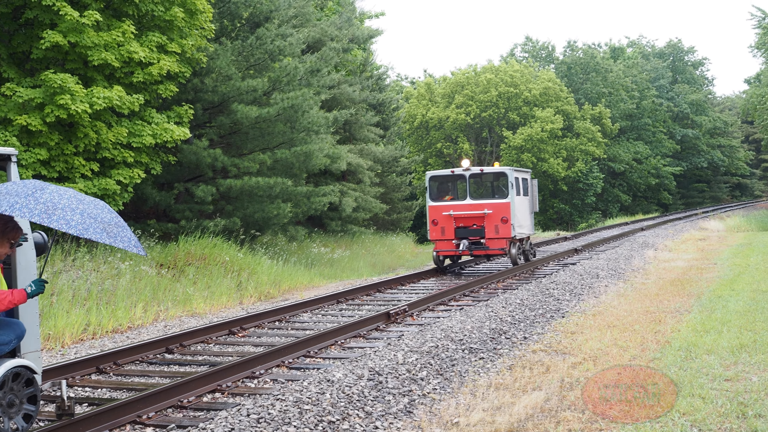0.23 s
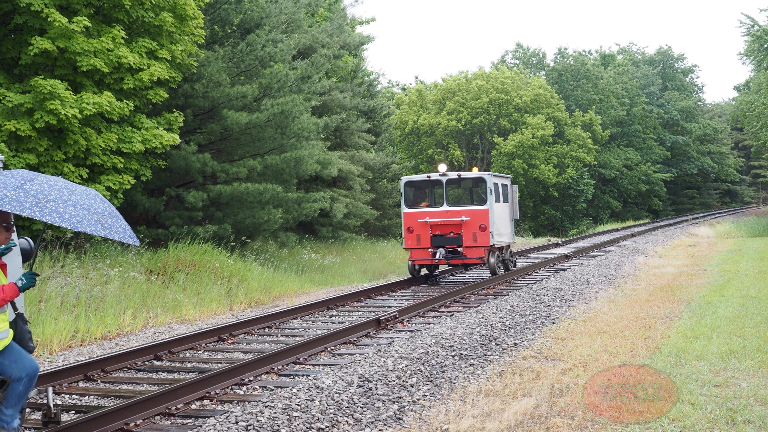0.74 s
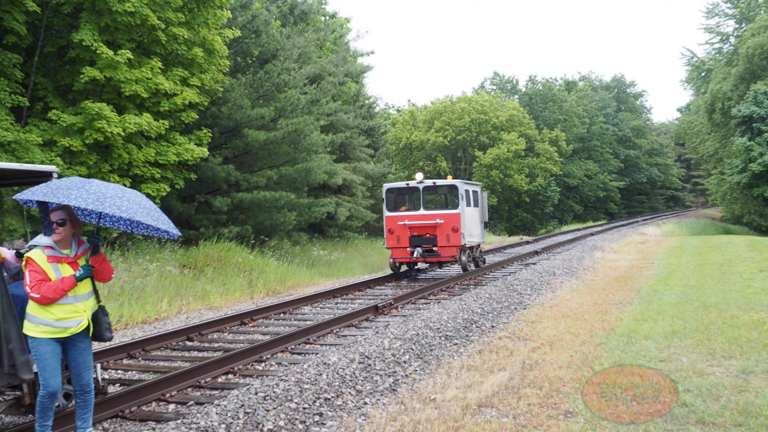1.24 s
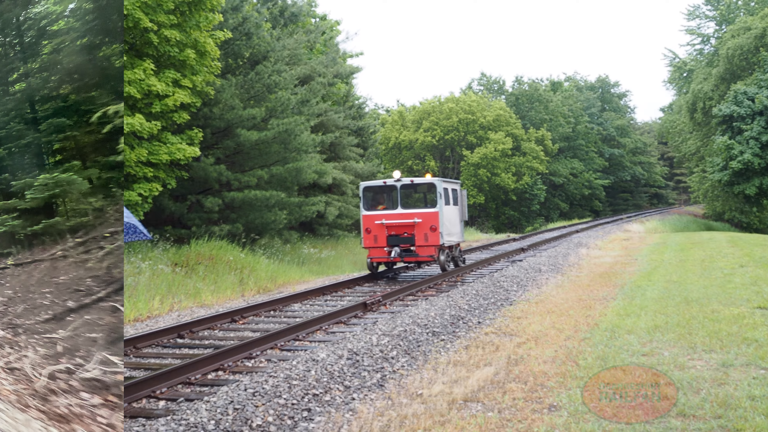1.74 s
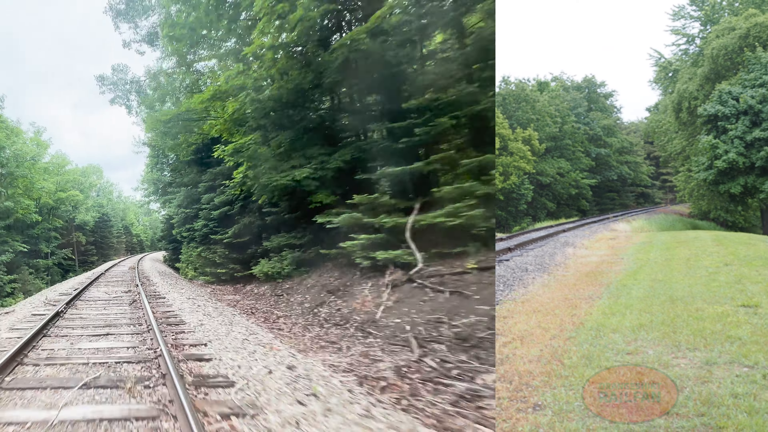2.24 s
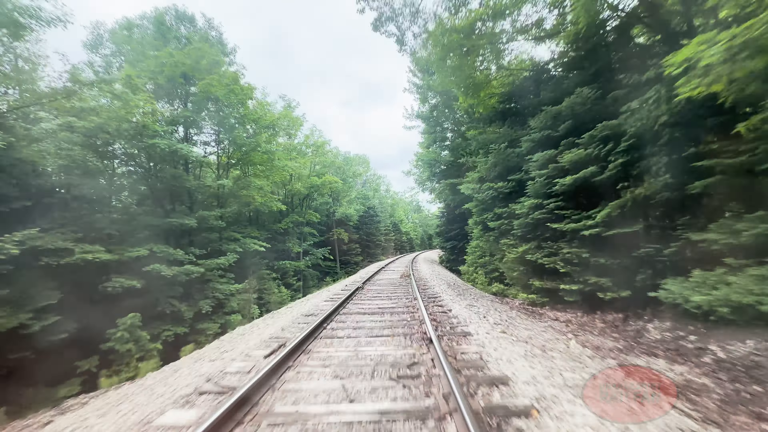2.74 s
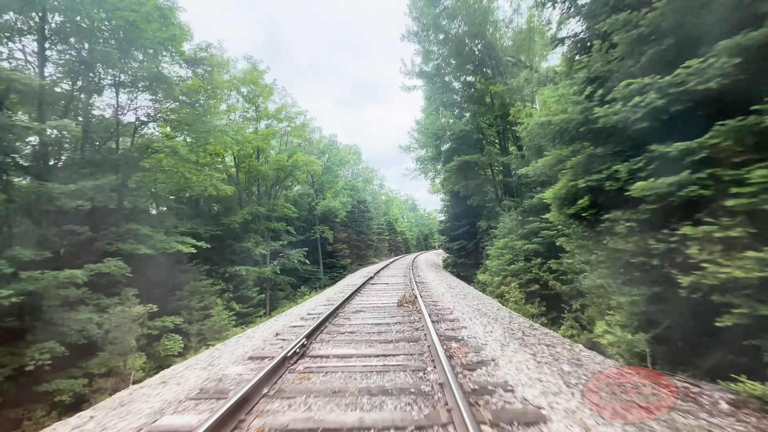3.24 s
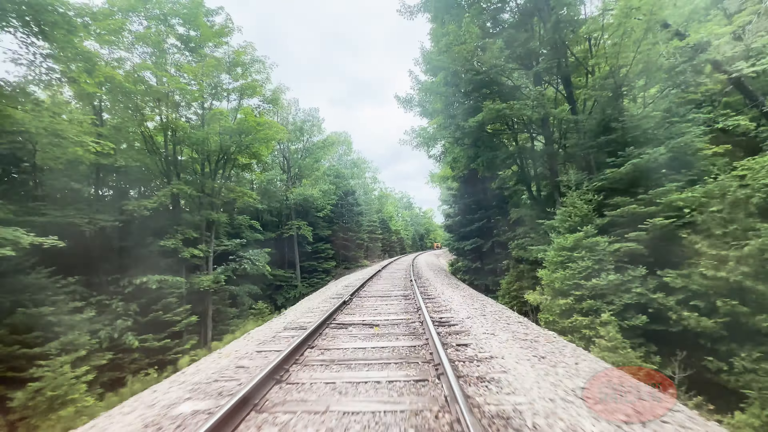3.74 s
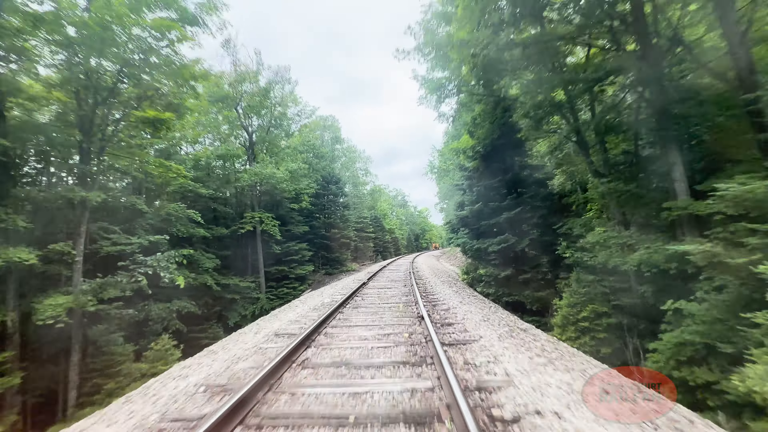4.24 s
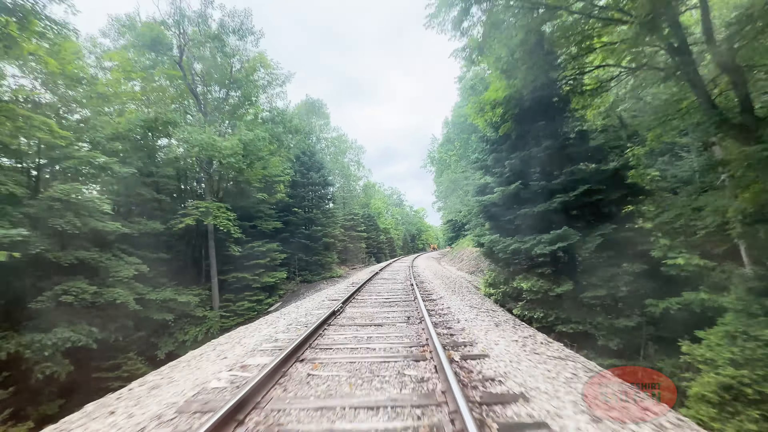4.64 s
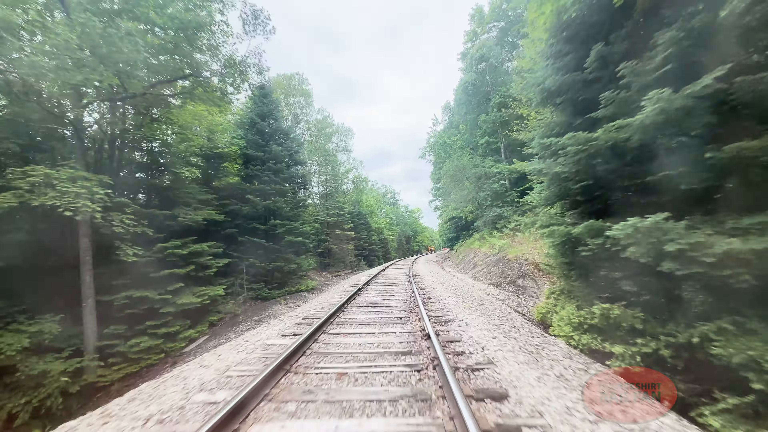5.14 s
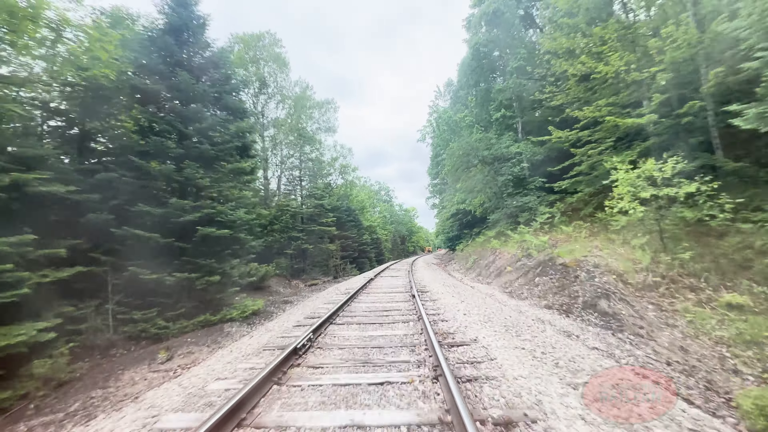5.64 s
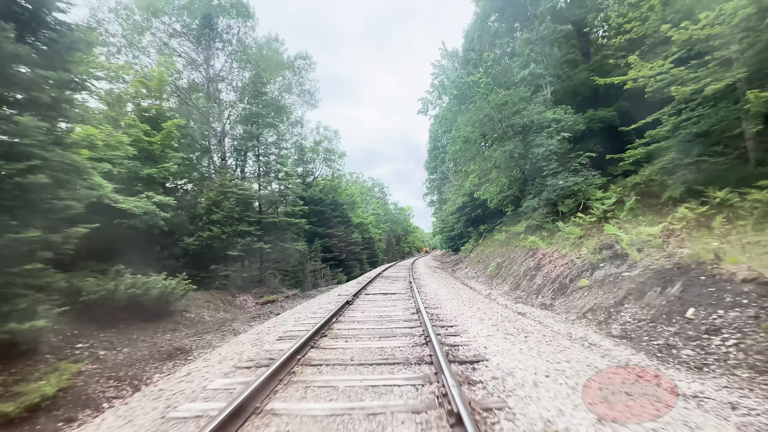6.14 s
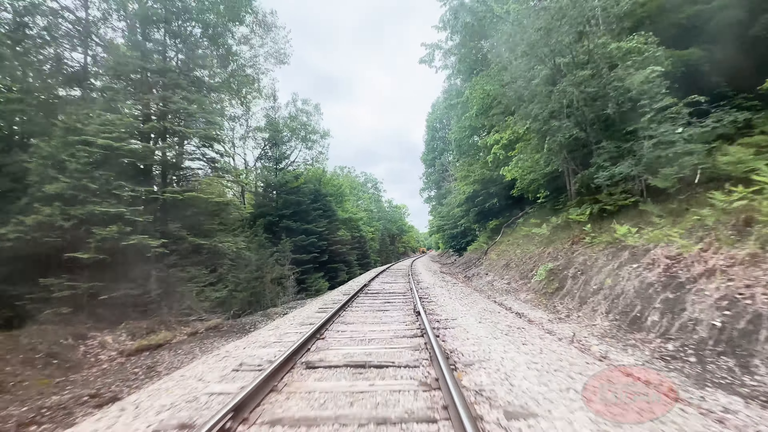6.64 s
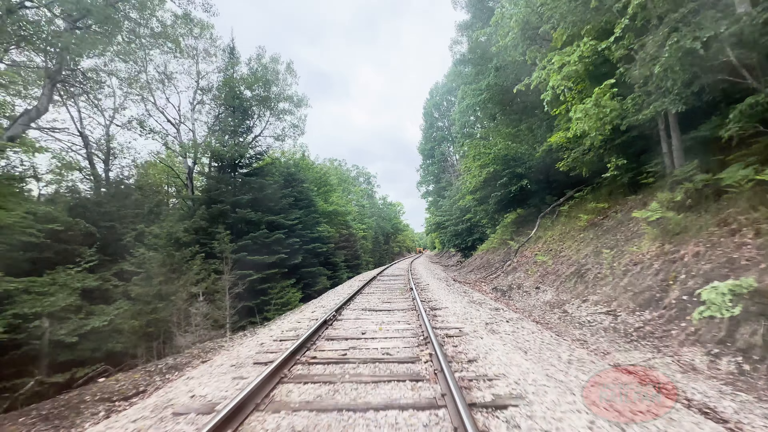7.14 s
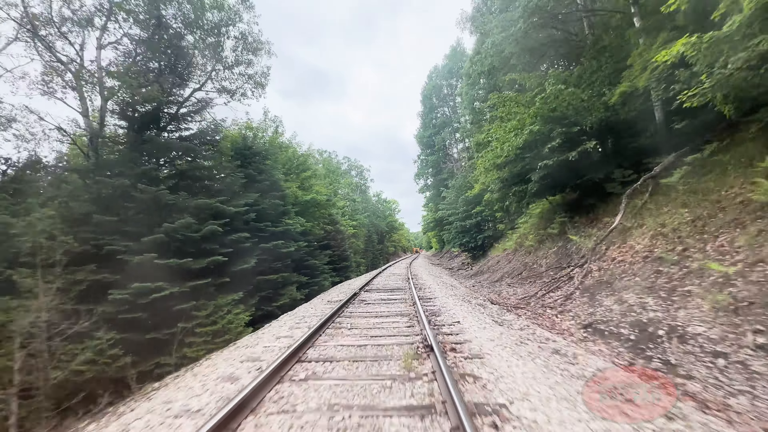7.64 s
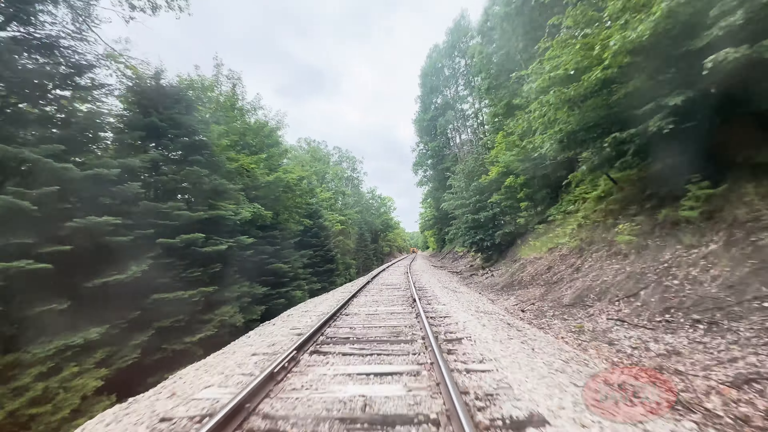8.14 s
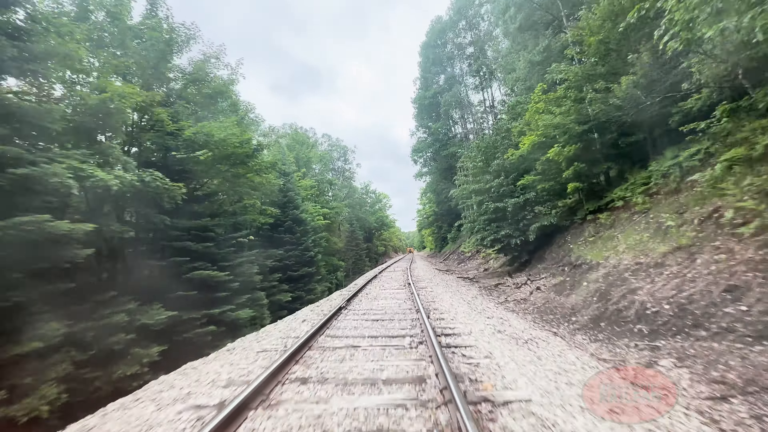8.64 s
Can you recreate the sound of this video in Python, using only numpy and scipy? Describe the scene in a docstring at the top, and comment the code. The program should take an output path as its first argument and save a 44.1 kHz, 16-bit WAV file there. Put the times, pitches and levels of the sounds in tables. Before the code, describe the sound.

A small motorcar idles with quick soft chugging and fades out, then a hard cut to loud wheel roar and irregular rail-joint clatter aboard.

```python
"""Beside a railway track, then, after a cut, aboard a moving rail car.
At the trackside a small two-cylinder motorcar idles and fades out: summed exhaust tones, noise taps rung by
the casing, hiss and light rain, with boxy knocks close by. Aboard, shaped noise makes the wheel roar, and
bursts of noise and wavering tones make the joint thumps, clatter and panel ringing. The engine hums with a
faint gear tone, and a loose part ticks on the left."""
import sys
import numpy as np
from scipy import signal
from scipy.fft import rfft, irfft
from scipy.io import wavfile
from scipy.ndimage import uniform_filter1d

SR = 44100
rng = np.random.default_rng(int(sys.argv[2]) if len(sys.argv) > 2 else 0)


def ratio(d):
    """dB to gain"""
    e = np.asarray(d, float) / 20
    return 10 ** e


def unload_wav(signal):
    """Save mono or channel-first audio to the path in sys.argv[1] as 16-bit WAV at rate SR, clipped to [-1, 1]."""
    wavfile.write(
        sys.argv[1],
        SR,
        np.round(np.clip(np.atleast_2d(signal).T, -1, 1) * 32767).astype(np.int16),
    )


N = 392490  # samples
CUT_S = 2.1605  # from the trackside to the ride

# Wheel roar spectrum. Each row: frequency in Hz, relative density in dB per Hz.
WHEEL_ROAR = [(30, -17), (78, -9.5), (115, -1.5), (308, -11), (487, -6.5), (1070, -15.5), (1300, -16),
              (1800, -21.5), (2200, -22.5), (2450, -25.5), (4420, -36.5), (4930, -34.5), (8690, -40),
              (15700, -64)]
# Clatter spectrum of the frame. Each row: frequency in Hz, relative density in dB per Hz.
FRAME_CLATTER = [(120, -31), (200, 2.5), (316, -15), (365, -0.5), (1790, -22.5), (2180, -25.5),
                 (3380, -41.5), (4870, -46.5), (8580, -49.5), (15700, -71)]
# Peaks of the car frame and cab, and narrow dips of the microphone.
# Each row: frequency in Hz, width in Hz, gain in dB.
RIDE_COLOUR = [(367, 8.3, 8.5), (780, 530, 2), (1310, 270, 4.5), (1592, 40, 4), (2194, 123, 6.5),
               (2430, 42, -18), (2850, 210, 6), (3840, 80, 7), (4880, 450, 8.5), (5244, 123, -17),
               (7440, 115, -21), (11740, 1900, -6)]
# How alike left and right are aboard. Each row: frequency in Hz, likeness from -1 to 1.
RIDE_LIKENESS = [(60, 1), (150, 0.71), (380, 0.39), (950, -0.17), (2380, 0.17), (5980, -0.18), (15000, 0.8)]
# Stereo balance aboard. Each row: frequency in Hz, left minus right in dB.
RIDE_LEAN = [(60, -0.5), (150, 1), (260, 5.5), (520, 1.5), (1000, 2), (2380, 2), (5980, 10.5), (15000, -6)]


def evened(x):
    """Scales to rms 1."""
    return x / np.sqrt(np.mean(x ** 2) + 1e-20)


def read(points, hz):
    """Reads a spectrum on a log-frequency axis."""
    f, value = np.transpose(points)
    return np.interp(np.log(hz + 1), np.log(f + 1), value)


def curve(rows):
    """Columns of a table at every sample; the first column is seconds."""
    s, *columns = np.transpose(rows)
    return [np.interp(np.arange(N) / SR, s, c) for c in columns]


def hiss(spectrum, same, lean=((1, 0), (2, 0)), peaks=(), grain_db=0, lo_hz=1, hi_hz=SR):
    """Shaped stereo noise of rms 1; grain scales each sample by a random number of decibels."""
    hz = np.fft.rfftfreq(N, 1 / SR)
    db = read(spectrum, hz) + sum(d / (1 + (2 * (hz - f) / w) ** 2) for f, w, d in peaks)
    edges = 1 / np.sqrt((1 + (lo_hz / (hz + 1)) ** 8) * (1 + (hz / hi_hz) ** 8))
    grain = ratio(grain_db * np.minimum(rng.exponential(size=N), 4.0))
    a, b = rfft(rng.standard_normal((2, N)) * grain)
    likeness = np.clip(read(same, hz), -1, 1)
    half_db = read(lean, hz) / 2
    left = a * ratio(half_db)
    right = (likeness * a + np.sqrt(1 - likeness ** 2) * b) / ratio(half_db)
    return evened(irfft(np.array([left, right]) * ratio(db) * edges, N))


def waver(smooth_s):
    """Slow random wander of rms 1: noise averaged twice."""
    size = max(round(smooth_s * SR), 1)
    return evened(uniform_filter1d(uniform_filter1d(rng.standard_normal(N), size), size))


def bursts(times, dbs, lengths, rise_s, hold=0.):
    """Envelope: each burst rises, holds for a share of its length, then dies; overlaps add in power."""
    power, t = np.zeros(N), np.arange(SR // 4) / SR
    for s, db, length in zip(times, dbs, np.clip(lengths, .003, .12)):
        rise = 1 - np.exp(-t / rise_s)
        decay = np.exp(-np.maximum(t - hold * length, 0) / ((1 - hold) * length))
        part = power[round(s * SR):][:len(t)]
        part += (ratio(db) * (rise * decay)[:len(part)]) ** 2
    return np.sqrt(power)


def ring(x, hz, width):
    """One resonance of peak gain near 1."""
    return signal.lfilter(*signal.iirpeak(hz, hz / width, SR), x)


def warble(hz, spread_hz, smooth_s, apart):
    """A tone of wandering pitch, leaning left; apart is the right ear's rms phase drift in radians."""
    turns = np.cumsum(hz + spread_hz * waver(smooth_s)) / SR
    ear_phase = np.array([0 * turns, apart * waver(smooth_s)])
    return np.sqrt(2) * np.cos(2 * np.pi * turns + ear_phase) * ratio([[0.7], [-0.7]])


def jolts():
    """Each joint shakes the frame: hard blow, panel clatter, clacks, small-part rattle, then a low thump."""
    # Jolts at rail joints. Each row: start in seconds, base level in dB, thump in dB over the base,
    # rattle in dB over the base, length in seconds.
    joints = [(2.281, -16.5, -4.5, -34, 0.038), (2.385, -13.5, -9.5, -27, 0.074),
              (2.474, -20.5, -21, -15.5, 0.026), (2.633, -16, -12, -25, 0.047),
              (2.831, -10.5, -25, -21.5, 0.032), (2.913, -15, -34, -21, 0.047),
              (2.979, -13, -28, -31, 0.078), (3.176, -11, -7.5, -22.5, 0.038),
              (3.215, -28.5, 6.5, -28, 0.053), (3.261, -18.5, -6, -14, 0.049),
              (3.621, -11, -32, -30, 0.051), (3.698, -22, -27, -23, 0.089), (3.853, -11.5, -14, -33, 0.058),
              (3.939, -14, -6.5, -24, 0.067), (3.977, -5, -7.5, -23, 0.03), (4.062, -18, -27, -16.5, 0.037),
              (4.278, -12, -12.5, -28, 0.052), (4.388, -12.5, -15, -32, 0.043),
              (4.44, -16, -21, -28, 0.049), (4.848, -11.5, -4, -24.5, 0.065), (5.097, -15.5, 0, -27, 0.025),
              (5.254, -10, -19, -24.5, 0.074), (5.33, -9, -14, -23, 0.061), (5.618, -11, -12, -27, 0.086),
              (5.885, -13, -4, -32, 0.037), (6.02, -13.5, -9, -35, 0.025), (6.067, -21, -24, -25, 0.15),
              (6.443, -11.5, -4.5, -24, 0.026), (6.524, -13.5, -31, -18, 0.027),
              (6.887, -10, -15, -25, 0.044), (6.942, -17.5, -25, -26, 0.11),
              (7.255, -7, -4.5, -23.5, 0.036), (7.335, -13, -17, -20.5, 0.025),
              (7.482, -12.5, -4.5, -30, 0.031), (7.704, -12.5, -30, -18, 0.046),
              (7.788, -9, -7.5, -23.5, 0.05), (8.039, -12, -7, -26, 0.15), (8.155, -17, -9, -16, 0.025),
              (8.378, -12, -10, -29, 0.038), (8.591, -9, -15.5, -27.5, 0.053),
              (8.831, -21, 5.5, -21, 0.091), (8.874, -6, 1.5, -25, 0.033)]
    s, db, thump_db, rattle_db, length = np.transpose(joints)
    thump = warble(131, 9., .02, apart=.6)
    thump += .5 * warble(168, 10., .02, apart=.8)
    thump += .3 * warble(362, 25., .015, apart=1.5)
    aboard = (FRAME_CLATTER, RIDE_LIKENESS, RIDE_LEAN, RIDE_COLOUR)
    clatter = hiss(*aboard, grain_db=2.0, hi_hz=2540)
    rattle = hiss(*aboard, grain_db=2.0, lo_hz=3110, hi_hz=10700)
    clack = hiss(*aboard, grain_db=5.5, lo_hz=920, hi_hz=3200)
    shake = bursts(s, db - 12.0, length, 0.003, hold=0.67) * ratio(3.7 * waver(0.0052))
    blow = bursts(s + 0.003, 2.65 * db, 0.017 + 0 * s, 0.0005)  # steep in level: only hard jolts crack
    thump *= bursts(s + 0.013, db + thump_db, length + 0.0047, 0.0029, hold=0.73)
    clack *= bursts(s, db + .5 * rattle_db - 3.5, length, 0.00091, hold=0.44)
    rattle *= bursts(s, db + rattle_db + 0.5, length, 0.0035, hold=0.53)
    resting = ratio(-33)  # the panels ring a little even between jolts
    return thump + clatter * (shake + blow) + rings(resting + 0.97 * shake) + clack + rattle


def rings(shaking):
    """Sparse taps of random size ring each panel briefly, harder while the frame shakes."""
    # Panel pitches: one list of frequencies in Hz.
    panels_hz = [215, 260, 300, 362, 420, 490, 675, 790, 990, 1330, 1600, 2200]
    taps_per_s, spread_db, sharpness = 24, 5.5, 17.2  # per panel and ear; sharpness is pitch over width
    out = np.zeros((2, N))
    for hz in panels_hz:
        struck = rng.random((2, N)) < taps_per_s / SR
        taps = struck * ratio(spread_db * np.minimum(rng.exponential(size=(2, N)), 3.0))
        taps = (taps + 0.18 * taps[::-1]) * shaking
        width = hz / sharpness
        rung = ring(ring(taps, hz, width), hz, 3.55 * width)
        out += rung * ratio(read(WHEEL_ROAR, hz)) / np.sqrt(width)
    return evened(out) * np.sqrt(np.mean(shaking ** 2)) * ratio([[1.2], [-1.2]])


def rolling():
    """Wheel roar through the cab, lumpy from rail roughness, over a low sway of the frame."""
    # The frame drops on its springs. Each row: start in seconds, level in dB.
    lurches = [(2.83, -20), (5.27, -16), (6.08, -23), (6.9, -16), (8.07, -22), (8.5, -24)]
    roar_db, rise_db_per_s, sway_db = -27.5, 0.1848, -32.5
    aboard = (WHEEL_ROAR, RIDE_LIKENESS, RIDE_LEAN, RIDE_COLOUR)
    low = hiss(*aboard, hi_hz=249) * ratio(2.2 * waver(0.014))
    mid = hiss(*aboard, grain_db=2.0, lo_hz=250, hi_hz=1770)
    mid *= ratio(-2.0 + 2.4 * waver(0.023) + 1.4 * waver(0.0043))
    high = hiss(*aboard, lo_hz=1560) * ratio(-11.0 + 1.13 * waver(0.015))
    s, db = np.transpose(lurches)
    rock = ratio(sway_db + 3.0 * waver(.04)) + bursts(s, db, 0.065 + 0 * s, 0.039, hold=0.62)
    sway = rock * warble(59, 6.0, .03, apart=.25)
    ride_s = np.arange(N) / SR - CUT_S
    return ratio(roar_db + rise_db_per_s * ride_s) * (low + mid + high) + sway


def bumps():
    """Small random knocks of the wheels keep the panels clattering between the joints."""
    bumps_per_s, top_db, spread_db, length_s = 16, -24.5, 12, 0.03
    place, size = rng.random((160, 2)).T
    s = CUT_S + np.cumsum(-np.log(1 - place)) / bumps_per_s  # exponential gaps
    db = top_db - spread_db * size
    shake = bursts(s[s < N / SR], db, length_s + 0 * s, 0.0061, hold=0.13)
    clatter = hiss(FRAME_CLATTER, RIDE_LIKENESS, RIDE_LEAN, RIDE_COLOUR, grain_db=2.5, hi_hz=6000)
    return clatter * shake


def whine():
    """The engine hums; as the load comes on a faint, unsteady gear tone rises at a multiple of the hum."""
    # The engine under load. Each row: time in seconds, hum in Hz, load level in dB.
    engine = [(2.16, 100, -38), (5.3, 99, -38), (5.8, 99.1, -33), (7.9, 99.1, -33), (8.3, 101.9, -33),
              (8.9, 103, -33)]
    teeth = 8  # gear tone over hum pitch
    hz, db = curve(engine)
    hum = ratio(db - 1.5 + 0.92 * waver(0.03)) * warble(hz, 2.03, 0.047, apart=0.11)
    gear_db = -37.5 + 2.9 * (db - db.max()) + 5.5 * waver(.02)  # grows faster than the hum
    return hum + ratio(gear_db) * warble(teeth * hz, 18.0, .012, apart=1.5)


def ticks():
    """A loose part snaps now and then, bright and to the left, and buzzes on briefly."""
    # Snaps of the loose part. Each row: start in seconds, level in dB.
    snaps = [(2.482, -25), (2.593, -31), (2.709, -30), (2.823, -31), (3.0506, -26.5), (3.262, -33),
             (3.404, -36.5), (4.454, -29), (4.929, -30), (5.392, -28), (5.706, -31.5), (5.835, -29),
             (5.9475, -32), (6.413, -33), (7.1242, -35), (7.3356, -27.5), (7.446, -31), (7.8645, -35),
             (8.079, -29), (8.201, -36), (8.3065, -36), (8.465, -35.5), (8.6647, -30), (8.8822, -28)]
    # Spectrum of a snap. Each row: frequency in Hz, relative density in dB per Hz.
    snap_colour = [(2500, -6), (4000, -2), (7000, 0), (10500, -9.5), (12000, -29), (16000, -27)]
    s, db = np.transpose(snaps)
    snap = bursts(s, db - 0.5, 0.003 + 0 * s, 0.00023)
    buzz = bursts(s, db - 8.5, 0.019 + 0 * s, 0.00089)
    return hiss(snap_colour, RIDE_LIKENESS, RIDE_LEAN, RIDE_COLOUR, grain_db=-4.0) * (snap + buzz)


def idle():
    """Exhaust harmonics shaped in phase by the pipe, valve taps ringing the casing, and hiss, under one fade."""
    # Idling speed. Each row: time in seconds, two-firing cycles per second.
    idle_speed = [(0, 11.26), (.6, 11.4), (1.15, 11.39), (2.16, 10.83)]
    # Exhaust tones. Each row: multiple of the two-firing cycle, relative level in dB.
    exhaust = [(4, -20), (5, -24), (6, -6), (7, -20), (8, 0), (9, -9), (10, -4), (12, -11), (13, -12),
               (14, -7), (15, -14), (16, -16), (17, -13), (18, -19), (19, -13), (20, -21), (21, -24),
               (22, -24), (24, -27)]
    # Pipe resonances. Each row: multiple of the cycle, half width in multiples, gain as a plain factor.
    pipe = [(8.5, .6, 6), (15.2, .8, 4)]
    # Engine casing, rung by each valve. Each row: frequency in Hz, width in Hz, relative level in dB.
    casing = [(456, 54, 3.5), (4360, 280, -1.5), (4950, 330, -9), (6900, 2200, -15), (13700, 2000, -34)]
    # Engine hiss and light rain. Each row: frequency in Hz, relative density in dB per Hz.
    yard_colour = [(88, 20), (150, -8), (217, -12), (346, -24), (473, -21), (739, -32), (989, -25.5),
                   (1610, -27.5), (2470, -40.5), (3570, -39), (4340, -40.5), (5480, -46), (15700, -56.5)]
    # How alike left and right are in the yard. Each row: frequency in Hz, likeness from -1 to 1.
    yard_likeness = [(60, 0.95), (240, 0.93), (950, 0.84), (3770, 0.063), (15000, 0.043)]
    exhaust_db, valves_db, yard_db, yard_sag_db_per_s = -29.5, -49, -36.5, -1.5
    second_valve_db = -0.5  # every other valve is softer
    start_cycles, valve_lead_cycles = -.247, .07
    fade_from_s, fade_to_s = 1.2, 2.157
    t = np.arange(N) / SR

    cycles = start_cycles + np.cumsum(curve(idle_speed)[0]) / SR
    beats = np.zeros(N)
    for k, db in exhaust:
        pipe_gain = 1 + sum(gain / (1 + 1j * (k - at) / width) for at, width, gain in pipe)
        phase = 1.35 * np.angle(pipe_gain) - .35 * max(k - 16, 0) ** 2
        beats -= ratio(db) * np.cos(2 * np.pi * k * cycles + phase)
    beats = ratio(exhaust_db + 0.28 * waver(0.0073)) * beats / np.std(beats[:SR])

    valve_cycles = cycles + valve_lead_cycles
    since = (2 * valve_cycles) % 1  # share of a firing since the last valve shut
    taps = np.exp(-since / 0.18) * ratio(1.7 * waver(0.03)) * rng.standard_normal((2, N))
    taps += 0.82 * taps[::-1] + 6.7 * np.exp(-since / 0.0059)  # the last term is a clean blow
    taps *= ratio(second_valve_db * (valve_cycles % 1 > .5))
    valves = np.zeros((2, N))
    for hz, width, db in casing:
        rung = evened(ring(ring(taps, hz, width), hz, 2 * width))
        valves += ratio(db + 3.5 * waver(.025)) * rung

    yard = hiss(yard_colour, yard_likeness, peaks=[(9800, 930, -21)], grain_db=3.0, lo_hz=189)
    yard *= ratio(yard_db + yard_sag_db_per_s * t + 1.3 * waver(0.016))
    fade = np.sin(np.pi / 2 * np.clip((fade_to_s - t) / (fade_to_s - fade_from_s), 0, 1))
    return fade * (beats + ratio(valves_db) * evened(valves) + yard)


def knocks():
    """Short knocks: a puff of noise with one pitch standing out, a boxy body and a bright click."""
    # Knocks beside the track. Each row: start in seconds, level in dB, pitch in Hz,
    # decay in seconds, click in dB relative to the knock.
    trackside_knocks = [(0.041, -29.5, 439, 0.032, -20), (0.197, -32, 497, 0.092, -25),
                        (0.23, -26.5, 430, 0.012, -25), (0.248, -31, 430, 0.016, -5),
                        (0.266, -24, 450, 0.0077, -25), (0.285, -28.5, 447, 0.045, -15),
                        (0.449, -22.5, 965, 0.015, -22), (0.475, -24.5, 1500, 0.012, -22),
                        (0.606, -29.5, 1228, 0.028, -5), (0.789, -37, 440, 0.011, -1),
                        (1.6, -38, 416, 0.015, -4)]
    # What a hard knock wakes: one list of frequencies in Hz.
    box_pitches_hz = [590, 927, 1370, 1660]
    out, t = np.zeros((2, N)), np.arange(SR // 8) / SR
    for s, db, hz, length, click_db in trackside_knocks:
        puff = rng.standard_normal((2, len(t)))
        puff += .5 * puff[::-1]
        pitch = np.sin(2 * np.pi * hz * t) + .5 * evened(ring(ring(puff, hz, 98), hz, 230))
        body = np.zeros((2, len(t)))
        for box_hz in box_pitches_hz:
            body += evened(ring(ring(puff, box_hz, 130), box_hz, 220))
            body += 0.47 * np.sin(2 * np.pi * box_hz * t)
        click = evened(ring(puff, 3800, 1200)) * np.exp(-t / 0.013)
        share = np.clip(ratio(db + 21), 0, 1)  # harder knocks wake more of the box
        knock = pitch + 1.33 * share * evened(body) + ratio(click_db) * click
        out[:, round(s * SR):][:, :len(t)] += ratio(db - 6.0) * knock * np.exp(-t / length)
    return out


def scene():
    """The trackside place, then a one-millisecond cut to the ride."""
    riding = np.clip((np.arange(N) / SR - CUT_S) / .001, 0, 1)
    trackside = idle() + knocks()
    ride = jolts() + bumps() + rolling() + whine() + ticks()
    return trackside * (1 - riding) + ride * riding


def roll_off(x):
    """The treble ends steeply here."""
    return signal.sosfilt(signal.butter(12, 15810, fs=SR, output="sos"), x)


def record(dry):
    """The microphone signal meets a soft ceiling that rounds off the loudest peaks."""
    mix = np.tanh(dry * 0.88) / 0.87
    return roll_off(mix)


dry = scene()
out = record(dry)
unload_wav(out)
```